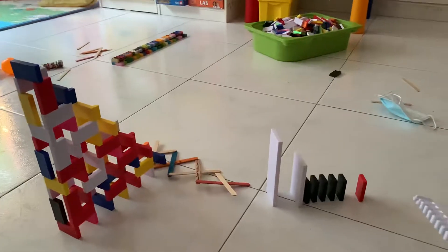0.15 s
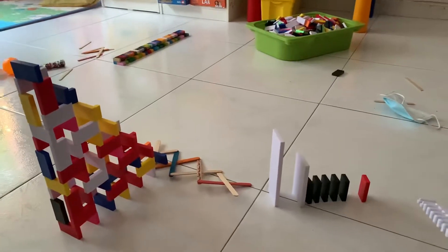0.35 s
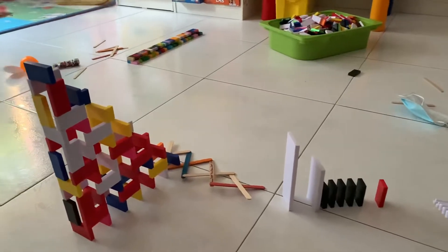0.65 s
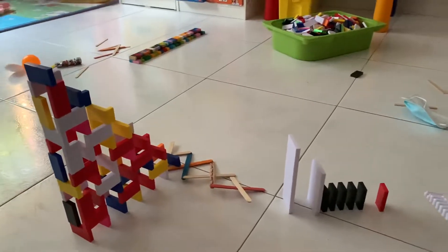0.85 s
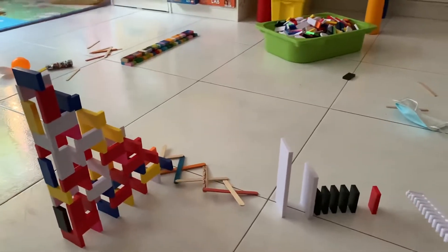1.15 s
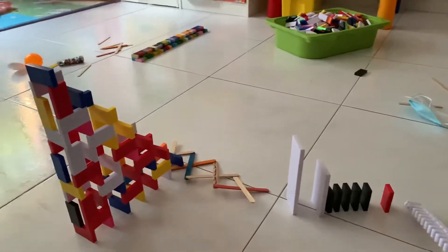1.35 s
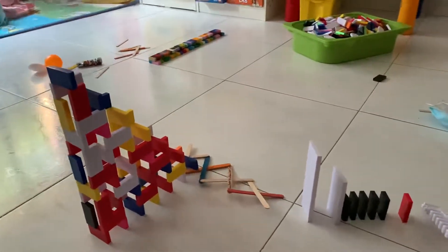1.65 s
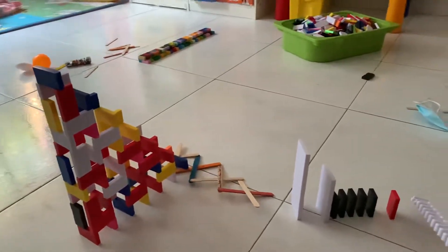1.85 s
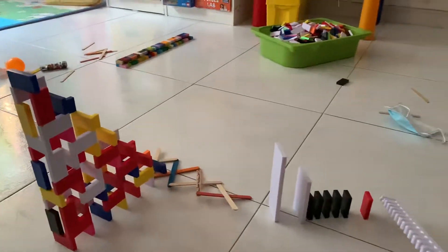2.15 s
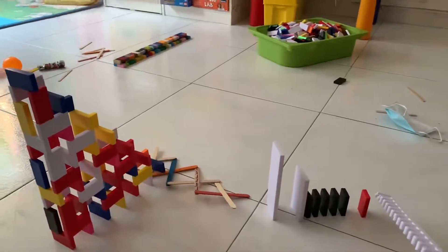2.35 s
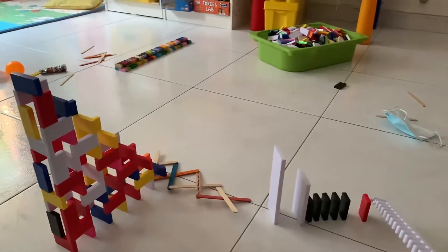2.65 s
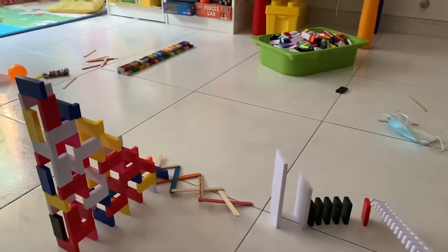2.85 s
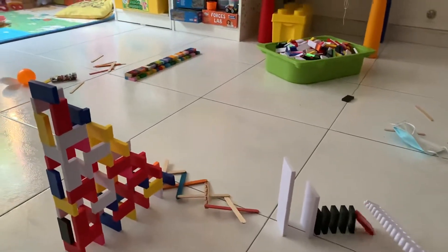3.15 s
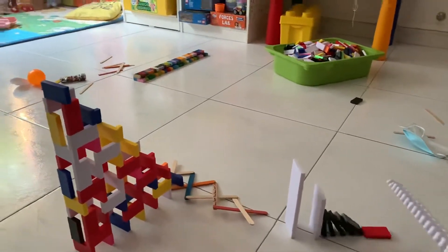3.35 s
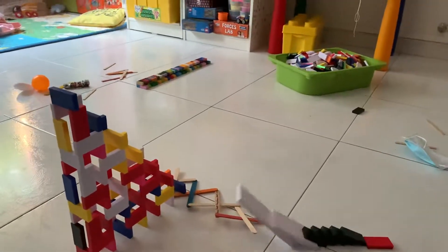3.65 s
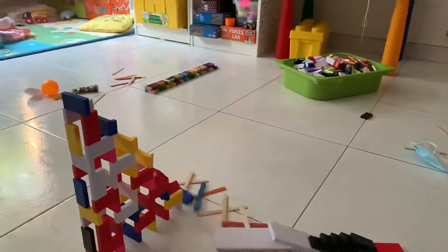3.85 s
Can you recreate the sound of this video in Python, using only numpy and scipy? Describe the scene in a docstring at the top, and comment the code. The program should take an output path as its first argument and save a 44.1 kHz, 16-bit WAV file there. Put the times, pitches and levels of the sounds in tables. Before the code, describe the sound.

After a quiet wait, a domino run taps, slaps and crashes into dense bright clacks indoors.

```python
"""A domino run on a tiled floor in a hard, bright room, heard from close by. A row of light tiles topples and
fells a few hard dominoes; these knock over a small and then a tall plastic slab, whose fall sets off a
clatter of sticks and blocks. Each collision is a burst of noise and overtones, most with ringing modes,
heard directly and through the room. Underneath: room noise, rumble, a faint swell of hiss with a thin
whistle, and a few far ticks."""
import sys
import numpy as np
from scipy import signal
from scipy.fft import rfft, irfft, next_fast_len
from scipy.io import wavfile
from scipy.ndimage import uniform_filter1d, map_coordinates

SR = 44100
rng = np.random.default_rng(int(sys.argv[2]) if len(sys.argv) > 2 else 0)


def transcribe(u):
    """Save the signal u as a 16-bit wav file named by the first command-line argument.

    u: samples, shape (n,) or (channels, n), limited to [-1, 1]; the rate is SR.
    q: integer samples, one column per channel.
    """
    v = np.clip(np.atleast_2d(u).T, -1, 1)
    q = np.round(v * 32767).astype(np.int16)
    wavfile.write(sys.argv[1], SR, q)


N = 176400

# Steady room noise. Each row: frequency in Hz, level in dB per Hz.
AIR_COLOUR = [(100, -8.5), (190, -1), (330, -7.5), (590, -7), (780, -15), (2600, -24.5), (5400, -45.5),
              (10300, -48.5), (16000, -68)]
# Likeness of left and right in the room noise. Each row: frequency in Hz, correlation (no unit).
AIR_LIKENESS = [(40, 1), (300, 0.8), (2000, 0.028)]
# Low rumble of the room. Each row: frequency in Hz, relative level in dB.
RUMBLE_COLOUR = [(25, -15), (38, -11.5), (53, 2.5), (66, -8.5), (90, -4), (200, -29.5), (600, -100)]
# Slow swell of hiss. Each row: time in seconds, level in dB.
HISS_LEVEL = [(0, -67.5), (.55, -62), (.9, -58), (1.8, -58), (2.3, -62), (3.0, -64)]
# Colour of that hiss. Each row: frequency in Hz, relative level in dB.
HISS_COLOUR = [(500, -11), (1000, 6.5), (2900, 3.5), (3900, -4.5), (5000, -21.5), (6300, -32),
               (9500, -21.5), (12000, -51)]
# Thin whistle within the hiss. Each row: time in seconds, centre pitch in Hz, centre level in dB.
WHISTLE_PATH = [(.9, 1908, -72), (1.25, 1951, -59.5), (2.25, 1982, -66), (2.5, 1950, -72)]
# Decay of the hard room. Each row: frequency in Hz, time to fall by 60 dB in seconds.
ROOM_DECAY = [(2500, 0.36), (6000, 0.5), (14000, 0.18)]

# Far ticks. Each row: start in seconds, level in dB, brightness in dB per octave.
FAR_TICKS = [(1.344, -43.5, 4.5), (2.718, -62, 9), (2.794, -47, -15.5)]
# What the ticks ring with. Each row: frequency in Hz, relative level in dB, 60 dB decay in seconds.
FAR_TICK_MODES = [(2530, 1, 0.097), (4030, -6, 0.042), (4410, -10, 0.069)]
# Contact of the ticks. Each row: frequency in Hz, relative level in dB.
FAR_TICK_COLOUR = [(900, -33), (2600, 3.5), (6500, -7.5), (10000, -7), (12000, -47)]

# The row of light tiles. Each row: start in seconds, level in dB.
TILE_HITS = [(3.142, -44.5), (3.185, -39.5), (3.207, -42.5), (3.229, -46), (3.256, -40.5)]
# What a tile rings with. Each row: frequency in Hz, relative level in dB, 60 dB decay in seconds.
TILE_RING = [(4594, 7.5, 0.094), (4800, -1, 0.08), (10000, -6.5, 0.18)]
# Contact of the tiles. Each row: frequency in Hz, relative level in dB.
TILE_CONTACT = [(400, -19), (2600, 6.5), (4700, 3), (5700, -16), (7600, -1), (9500, -20), (15500, -11.5)]

# Hard dominoes meeting edge on. Each row: start in seconds, level in dB, 60 dB contact decay in seconds.
DOMINO_CLICKS = [(3.252, -20, 0.0072), (3.294, -27.5, 0.0032), (3.325, -33.5, 0.0092), (3.697, -15, 0.032),
                 (3.7223, -10, 0.02), (3.8328, -12, 0.069), (3.8522, -19.5, 0.045), (3.8615, -19, 0.047)]
# Contact of the dominoes. Each row: frequency in Hz, relative level in dB.
DOMINO_CONTACT = [(400, -29), (1500, -3), (4000, -0.5), (6000, -8.5), (8200, 3), (10000, 2.5), (14500, 3)]

# The last domino leans into the small slab. Each row: start in seconds, level in dB, ring over contact in dB.
SLAB_NUDGES = [(3.341, -28.5, 0), (3.3478, -29, 2)]
# What a nudge sets ringing. Each row: frequency in Hz, relative level in dB, 60 dB decay in seconds.
NUDGE_RING = [(1375, -13, 0.14), (2655, -5, 0.3), (2700, -1.5, 0.17), (5280, -0.5, 0.025), (6560, -9, 0.08)]
# Contact of the nudges. Each row: frequency in Hz, relative level in dB.
NUDGE_CONTACT = [(400, -9), (2000, -1.5), (5600, -9), (15000, -15)]
# The small slab strikes the tall one and rebounds. Each row: start in seconds, level in dB.
SLAB_SLAPS = [(3.4595, -17), (3.4625, -22), (3.4685, -19), (3.482, -30.5), (3.5321, -30.5), (3.547, -52)]
# What the small slab rings with. Each row: frequency in Hz, relative level in dB, 60 dB decay in seconds.
SLAP_RING = [(1350, -9, .07), (1560, -10, .06), (2042, -1, .05), (2132, 1, .07), (2380, -2, .05),
             (2650, -7, .15), (2935, -8, .22), (3746, -11, .1)]
# Contact of the slaps. Each row: frequency in Hz, relative level in dB.
SLAP_CONTACT = [(250, -10.5), (800, -7), (2200, 7), (3300, -5), (8000, -11.5), (15000, -14.5)]

# The tall slab, sticks and blocks land on the floor.
# Each row: start in seconds, level in dB, brightness in dB per octave, centre pitch of the knock in Hz.
LANDINGS = [(3.679, -28, -18, 2230), (3.712, -16.5, -13, 1910), (3.7205, -12.5, 2.5, 1820),
            (3.7232, -11.5, 0, 2395), (3.727, -15.5, -2.5, 1706), (3.7395, -24, -3, 2430),
            (3.781, -22, -4, 2920), (3.7937, -27, -10, 1520), (3.797, -31.5, 3, 565),
            (3.802, -15.5, -9, 2415), (3.84, -25.5, 15, 1590), (3.8468, -23.5, -6, 2580),
            (3.876, -16, -12.5, 1794), (3.8885, -14.5, 12, 2685), (3.892, -10, -2.5, 1877),
            (3.897, -16, 3, 1800), (3.912, -15.5, 7.5, 2900), (3.932, -18.5, 1, 1710), (3.95, -21, 0, 1650),
            (3.9629, -17.5, 0, 2870)]
# What the tall slab and the blocks ring with. Each row: frequency in Hz, relative level in dB.
LANDING_RING = [(1455, -6), (1746, 0), (1819, -3), (2323, -3), (2418, -2), (2636, 0), (2863, -3),
                (2928, -1), (3001, -2), (3259, -7)]
# Contact of the landings. Each row: frequency in Hz, relative level in dB.
LANDING_CONTACT = [(250, -51), (580, -13.5), (850, -11), (1600, 3.5), (2700, 12), (3700, 5), (5200, 5),
                   (7000, -8), (9700, 5), (15000, -11)]

AIR_DB, RUMBLE_DB, RUMBLE_SURGE_DB = -52.5, -53, 0.5
ROOM_BUILD_S = 0.00039
HIT_T = np.arange(SR // 4) / SR  # clock of one collision (s)
LEVEL_WINDOW = SR * .002  # a hit at 0 dB has the energy of 2 ms at rms 1 (samples)
TILT_FROM_HZ = 2530  # brightness acts above this; a softer contact loses what lies there
# plastic pieces also sound overtones of their own: range (Hz), 60 dB decay (s), level over the chatter (dB)
OVERTONE_HZ, OVERTONE_T60, OVERTONE_DB = (1292.5, 15410), 0.087, -1
RING_RISE = 1 - np.exp(-HIT_T / .0008)  # modes take a moment to build up
RING_WAVER = 0.0082  # least relative pitch waver of a rattling piece; detuning adds to it
LANDING_RING_T60 = 0.17  # (s)
# knock of a landing: 60 dB decay (s), relative spread of its modes, level over the contact (dB)
KNOCK_T60, KNOCK_SPREAD, KNOCK_DB = .05, .07, -3.5
# small bounces between the landings: span (s), number, mean level (dB), spread (dB)
BOUNCE_SPAN, BOUNCE_COUNT, BOUNCE_DB, BOUNCE_SPREAD_DB = (3.735, 3.99), 12, -31, 2
TOP_HZ = 15500  # band limit of the microphone


def amp(db):
    """Decibels to gain."""
    return 10 ** (np.asarray(db) / 20)


def unit(x):
    """Scale to rms 1."""
    return x / np.sqrt(np.mean(x ** 2) + 1e-20)


def along(points, hz):
    """Read (Hz, value) points on a log frequency axis."""
    f, v = np.transpose(points)
    return np.interp(np.log(hz + 1), np.log(f + 1), v)


def curves(rows):
    """One value per sample for each column after the time."""
    seconds, *columns = np.transpose(rows)
    return [np.interp(np.arange(N) / SR, seconds, column) for column in columns]


def wobble(rate):
    """A smooth random curve, rate knots a second."""
    knots = rng.standard_normal(int(N * rate / SR) + 4)
    return map_coordinates(knots, [np.arange(N) * rate / SR])


def filtered(x, response):
    """x times a response of frequency."""
    n = x.shape[-1]
    padded = next_fast_len(n + SR // 10)
    spectrum = rfft(x, padded) * response(np.fft.rfftfreq(padded, 1 / SR))
    return irfft(spectrum, padded)[..., :n]


def tone(hz):
    """A sine of rms 1 that follows a pitch curve."""
    return np.sqrt(2) * np.sin(2 * np.pi * np.cumsum(hz) / SR)


def rush(colour):
    """Stereo room noise of rms 1, nearly mono in the bass."""
    def mid_side(hz):
        # twice this angle has the wanted left-right correlation as its cosine
        angle = np.arccos(np.clip(along(AIR_LIKENESS, hz), -1, 1)) / 2
        return amp(along(colour, hz)) * [np.cos(angle), np.sin(angle)]

    mid, side = filtered(rng.standard_normal((2, N)), mid_side)
    return unit(np.array([mid + side, mid - side]))


def fuzzy_whistle():
    """A thin sine whose pitch and level waver separately on each side."""
    pitch_hz, level_db = curves(WHISTLE_PATH)
    sides = []
    for _ in range(2):
        level = amp(level_db + 1.6 * wobble(40.1))
        sides.append(level * tone(pitch_hz + 35 * wobble(150)))
    return np.array(sides)


def background():
    """Room noise, a surging rumble, and a slow swell of hiss that carries the whistle."""
    air = amp(AIR_DB) * rush(AIR_COLOUR)
    rumble = amp(RUMBLE_DB + RUMBLE_SURGE_DB * wobble(10)) * rush(RUMBLE_COLOUR)
    hiss_db, = curves(HISS_LEVEL)
    hiss = amp(hiss_db) * rush(HISS_COLOUR)
    return air + rumble + hiss + fuzzy_whistle()


def room():
    """The room's stereo answer to a hit: decaying noise of energy 1 on the left, drawn anew each time."""
    hz, t, bands = signal.stft(rng.standard_normal((2, SR // 2)), SR, nperseg=256)
    decay = amp(-60 * t / along(ROOM_DECAY, hz)[:, None])
    tail = signal.istft(bands * decay, SR, nperseg=256)[1]
    tail = tail * (1 - np.exp(-np.arange(tail.shape[1]) / SR / ROOM_BUILD_S))
    return tail / np.linalg.norm(tail[0])


def brightness(hz, tilt_db):
    """Level in dB of a tilt per octave above its corner."""
    return tilt_db * np.log2(np.maximum(hz / TILT_FROM_HZ, 1))


def causal(colour, tilt_db, size=1024):
    """The shortest (minimum-phase) impulse response with this colour and tilt, up to a gain."""
    hz = np.fft.rfftfreq(size, 1 / SR)
    cepstrum = irfft(np.log(amp(along(colour, hz) + brightness(hz, tilt_db))))
    # fold the cepstrum onto positive times; the phase term restores its one-sample offset
    folded = rfft(2 * cepstrum[1:size // 2], size) * np.exp(-2j * np.pi * hz / SR)
    return irfft(np.exp(folded))


def contact(colour, contact_t60, tilt_db, overtone_db):
    """The touch of two surfaces: dying noise, mostly alike on both sides, and 18 random overtones."""
    t = HIT_T
    noise = rng.standard_normal(len(t)) + .5 * rng.standard_normal((2, len(t)))
    chatter = unit(noise * amp(-60 * t / contact_t60))
    pitches = rng.uniform(*OVERTONE_HZ, size=(18, 1))
    overtones = np.sin(2 * np.pi * pitches * t).sum(axis=0) * amp(-60 * t / OVERTONE_T60)
    source = chatter + amp(OVERTONE_DB + overtone_db) * unit(overtones)
    return unit(signal.fftconvolve(source, causal(colour, tilt_db)[None], axes=1)[:, :len(t)])


def knock(hz):
    """A few close, quickly damped modes give a landing its own pitch."""
    cluster = hz * (1 + KNOCK_SPREAD * (np.arange(-1, 2) + rng.random(size=3) - .5))
    waves = np.sin(2 * np.pi * cluster[:, None] * HIT_T).sum(axis=0)
    return unit(RING_RISE * waves * amp(-60 * HIT_T / KNOCK_T60))


def ringing(modes, tilt_db, detune):
    """The modes of one piece, stirred differently by each blow and wavering as it rattles."""
    t = HIT_T
    waver = unit(uniform_filter1d(rng.standard_normal(len(t)), size=200))
    clock = np.cumsum(1 + detune * rng.normal() + (RING_WAVER + detune) * waver) / SR
    ring = np.zeros(len(t))
    for hz, db, t60 in modes:
        level_db = db + brightness(hz, tilt_db) + 2 * rng.normal()
        ring += amp(level_db - 60 * t / t60) * np.sin(2 * np.pi * (hz * clock + rng.random()))
    return RING_RISE * ring


def hit(colour, contact_t60, room_db, pan_db, modes=(), ring_db=0, tilt_db=0, overtone_db=0, knock_hz=0,
        detune=0):
    """One collision: contact, knock and ring, heard directly (pan_db is left over right) and via the room."""
    body = contact(colour, contact_t60, tilt_db, overtone_db)
    if knock_hz:
        body = unit(body + amp(KNOCK_DB) * knock(knock_hz))
    if len(modes):
        body = unit(body + amp(ring_db) * unit(ringing(modes, tilt_db, detune)))
    body = body * np.sqrt(LEVEL_WINDOW / len(HIT_T))
    out = amp(room_db) * signal.fftconvolve(body, room(), axes=1)
    out[:, :len(HIT_T)] += body * amp([[pan_db / 2], [-pan_db / 2]])
    return out


def play(hits):
    """Lay (s, dB, sound) collisions on the time line."""
    out = np.zeros((2, N + 2 * SR))
    for s, db, sound in hits:
        start = round(s * SR)
        out[:, start:start + sound.shape[1]] += amp(db) * sound
    return out[:, :N]


def far_ticks():
    """Small things touched elsewhere in the room, well to the left: short contacts with a brief ring."""
    return play((s, db, hit(FAR_TICK_COLOUR, contact_t60=0.033, room_db=-1, pan_db=9, modes=FAR_TICK_MODES,
                            overtone_db=-10, tilt_db=tilt))
                for s, db, tilt in FAR_TICKS)


def tiles():
    """The light tiles tip one another over, a touch to the right: ringing taps with much room."""
    return play((s, db, hit(TILE_CONTACT, contact_t60=0.011, room_db=8, pan_db=-1, modes=TILE_RING,
                            ring_db=1, detune=0.016))
                for s, db in TILE_HITS)


def dominoes():
    """Hard dominoes click brightly and hardly ring."""
    return play((s, db, hit(DOMINO_CONTACT, contact_t60=t60, room_db=1, pan_db=-1.0, overtone_db=-18))
                for s, db, t60 in DOMINO_CLICKS)


def small_slab():
    """The small slab is nudged, tips and slaps against the tall one, its modes ringing."""
    nudges = play((s, db, hit(NUDGE_CONTACT, contact_t60=0.028, room_db=1.5, pan_db=0, modes=NUDGE_RING,
                              ring_db=ring_db, detune=RING_WAVER))
                  for s, db, ring_db in SLAB_NUDGES)
    slaps = play((s, db, hit(SLAP_CONTACT, contact_t60=0.031, room_db=0, pan_db=2.5, modes=SLAP_RING))
                 for s, db in SLAB_SLAPS)
    return nudges + slaps


def small_bounces():
    """Random small bounces among the landings, without a knock: (s, dB, dB per octave, 0)."""
    bounces = []
    for _ in range(BOUNCE_COUNT):
        level_db = BOUNCE_DB + BOUNCE_SPREAD_DB * rng.normal()
        bounces.append((rng.uniform(*BOUNCE_SPAN), level_db, 2 + rng.normal(), 0))
    return bounces


def collapse():
    """The tall slab lands and the pieces scatter: pitched clacks with small bounces between."""
    modes = [(hz, db, LANDING_RING_T60) for hz, db in LANDING_RING]
    return play((s, db, hit(LANDING_CONTACT, contact_t60=0.02, room_db=-2, pan_db=5, modes=modes,
                            ring_db=-6.5, tilt_db=tilt, knock_hz=hz))
                for s, db, tilt, hz in list(LANDINGS) + small_bounces())


def scene():
    """The whole run over the room's background."""
    run = tiles() + dominoes() + small_slab() + collapse()
    return background() + far_ticks() + run


def record(dry, notch_hz=11700, notch_width_hz=480, notch_db=-20):
    """The microphone has a notch in the high treble and a steep band limit."""
    def response(hz):
        notch = amp(notch_db * np.exp(-((hz - notch_hz) / notch_width_hz) ** 2))
        return notch / (1 + (hz / TOP_HZ) ** 120)

    return filtered(dry, response)


dry = scene()
out = record(dry)
transcribe(out)
```